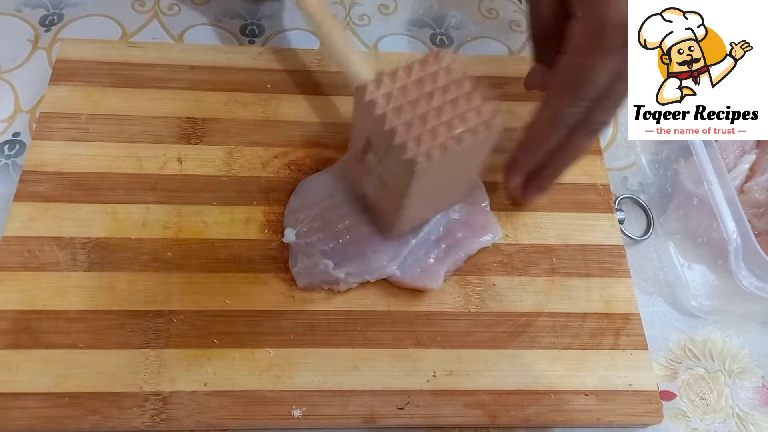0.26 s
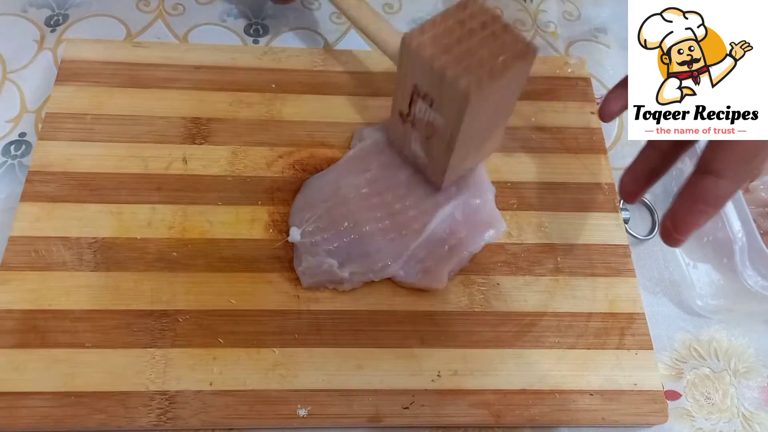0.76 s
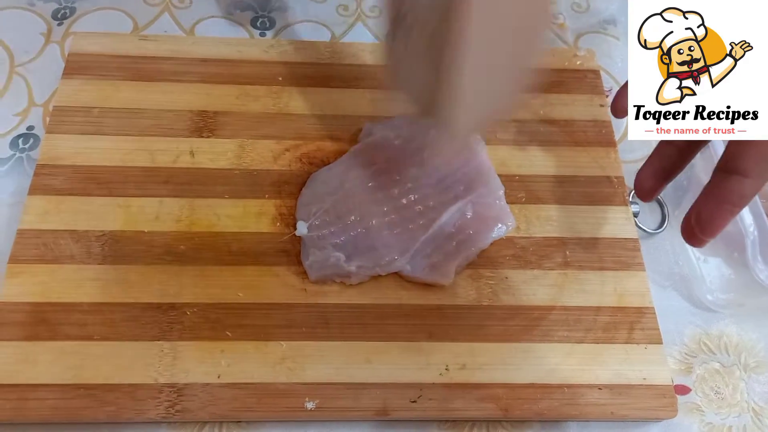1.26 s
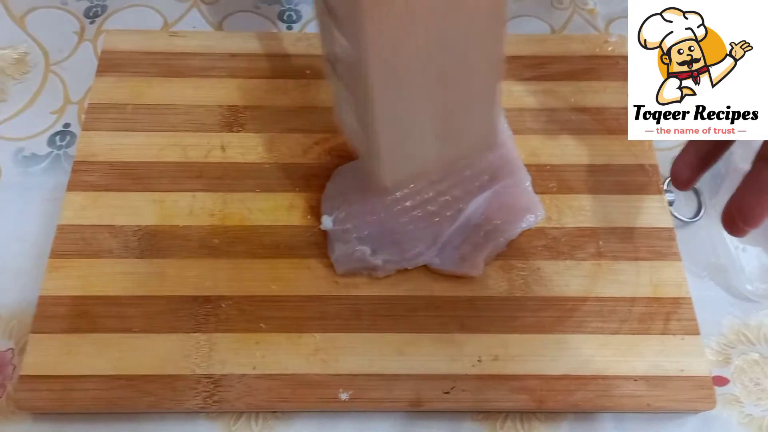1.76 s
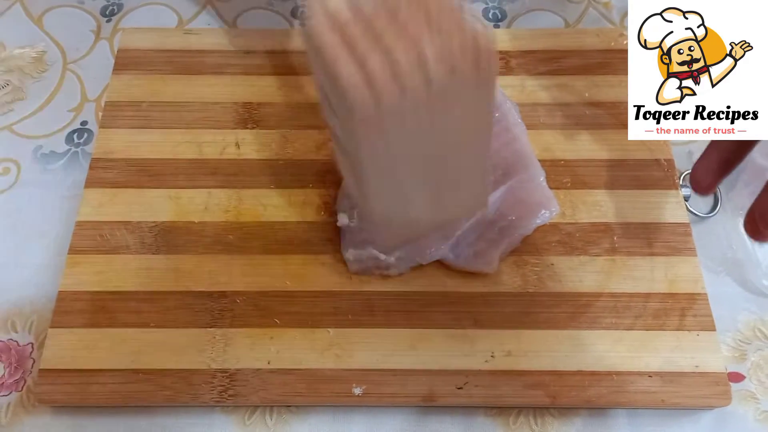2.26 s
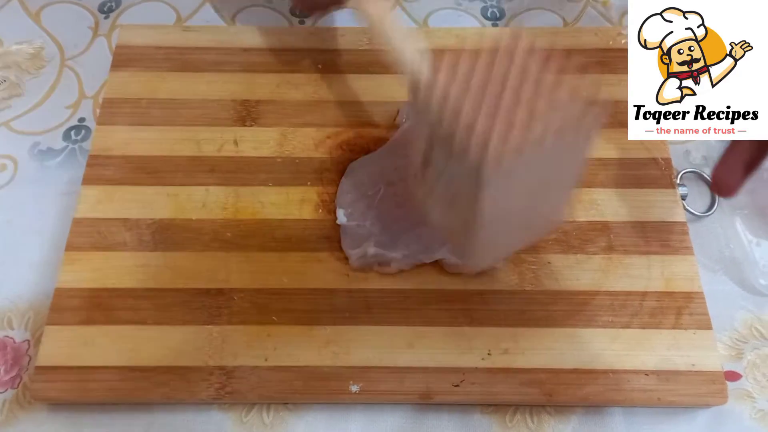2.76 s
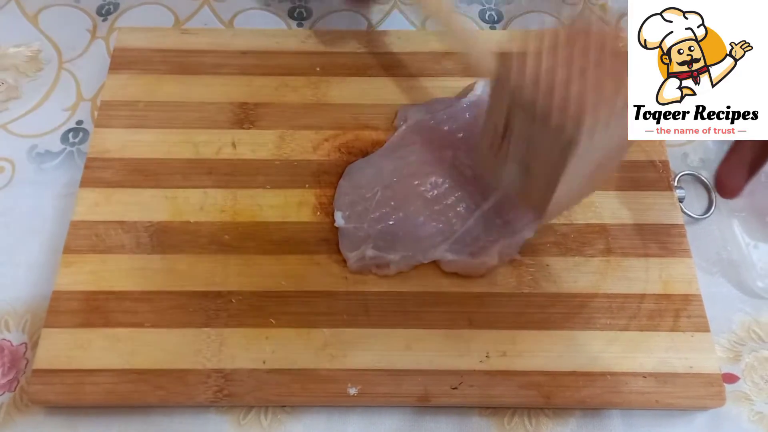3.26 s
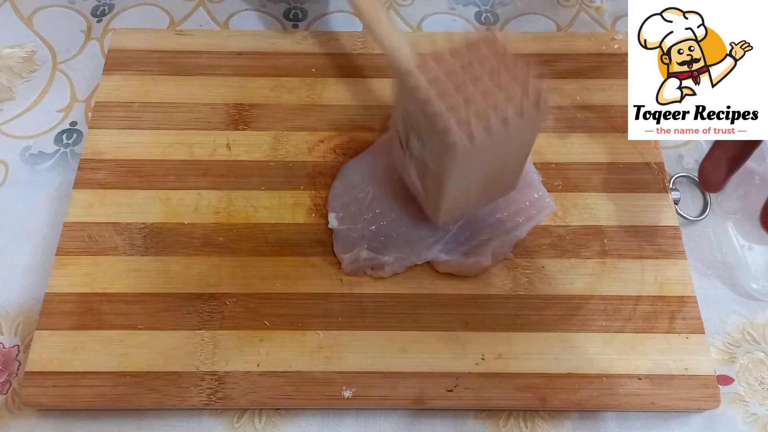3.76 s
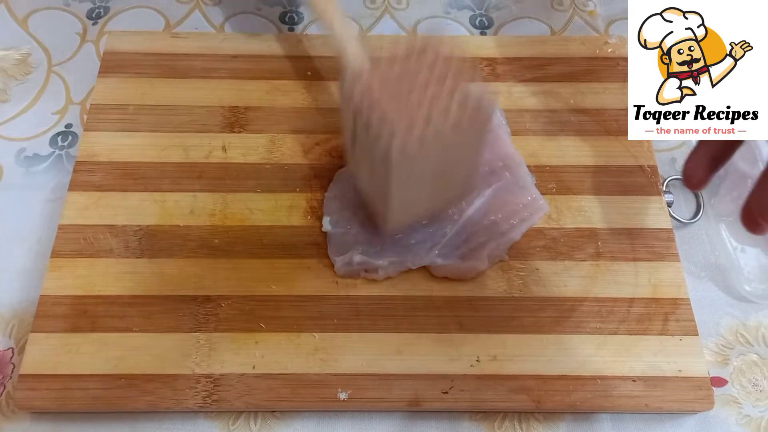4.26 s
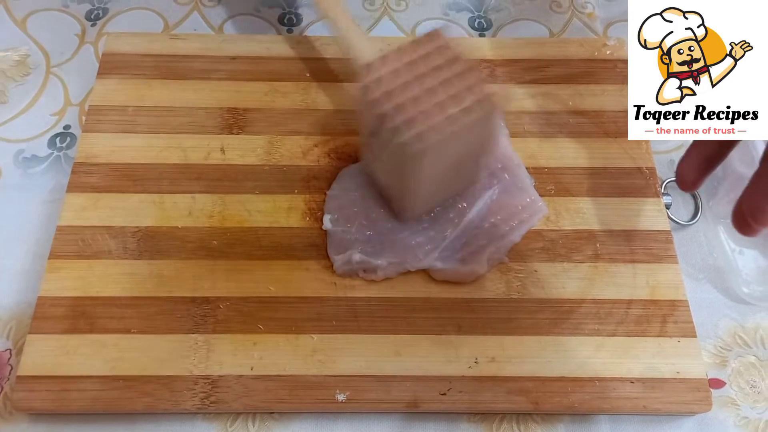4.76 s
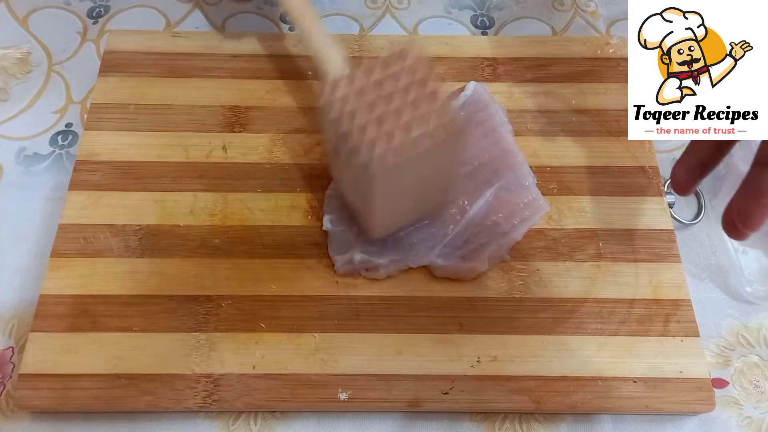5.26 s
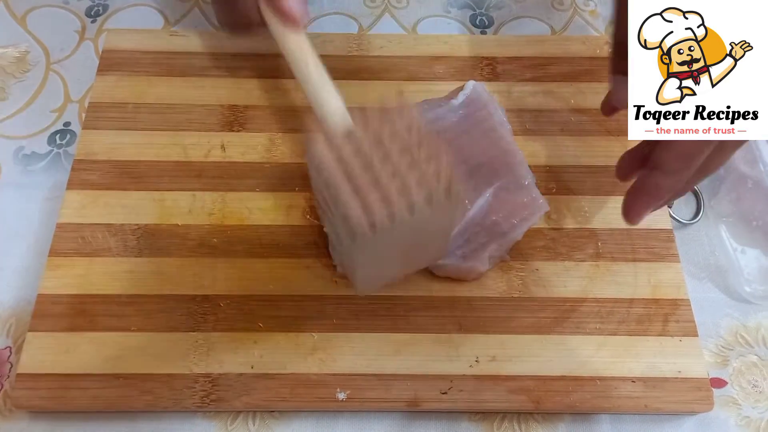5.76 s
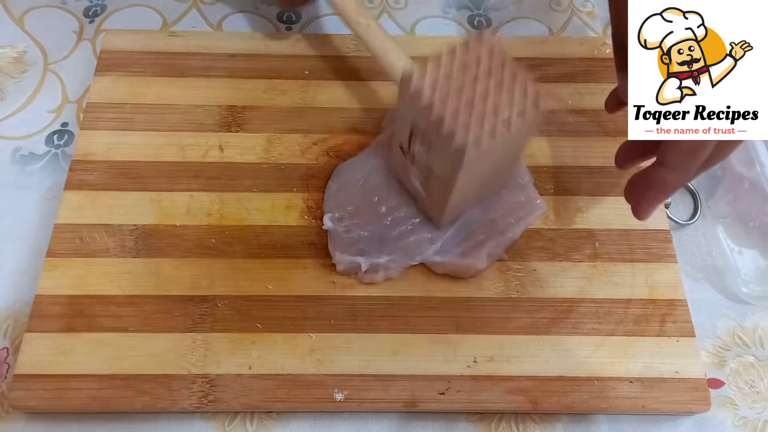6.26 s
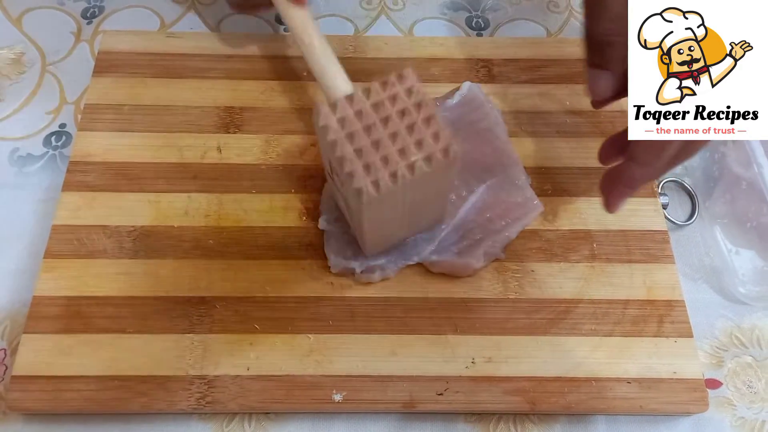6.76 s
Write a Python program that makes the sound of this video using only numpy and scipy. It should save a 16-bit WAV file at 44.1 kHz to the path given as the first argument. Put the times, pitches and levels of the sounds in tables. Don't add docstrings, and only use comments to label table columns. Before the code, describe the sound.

A wooden mallet beats a slice of raw meat on a wooden board at nearly four blows per second without pausing. Each hit is a loud, low, cushioned thud of board and table, with a short dry knock and a quick wet slap. Strength varies from blow to blow. A phone close by picks up short reflections from a small kitchen over a very faint low rumble.

```python
import sys
import numpy as np
from scipy import signal
from scipy.fft import rfft, irfft, next_fast_len
from scipy.io import wavfile
from scipy.ndimage import uniform_filter1d

SR = 44100
rng = np.random.default_rng(int(sys.argv[2]) if len(sys.argv) > 2 else 0)


def volts_from_decibels(level):
    exponent = np.asarray(level, float) / 20
    return 10 ** exponent


def wav_record(signal):
    frames = np.transpose(np.atleast_2d(signal))
    bounded = np.clip(frames, -1, 1)
    quanta = np.round(bounded * 32767).astype(np.int16)
    wavfile.write(sys.argv[1], SR, quanta)


N = 308259

# t/s, thud level/dB, knock level/dB,
# tilt of the knock from board edge to mallet head/dB
BLOWS = [(-0.0202, -13.5, -39.5, 26.5), (0.2556, -16, -19, 2), (0.5433, -12, -22.5, -7),
         (0.822, -11.5, -14.5, -3), (1.1077, -10, -15.5, -1.5), (1.3798, -9.5, -21.5, 6),
         (1.6556, -13, -26.5, 11.5), (1.9197, -8.5, -17, 6), (2.1826, -12, -14.5, -5.5),
         (2.4412, -9, -15.5, -9.5), (2.7097, -14, -26, 2), (2.9757, -12.5, -18, 9.5),
         (3.2377, -9.5, -17.5, 16), (3.4857, -11.5, -32.5, 5.5), (3.75, -12.5, -33, 29),
         (3.991, -15.9, -32.5, -13.5), (4.2338, -8, -18, 0.5), (4.495, -7.5, -24.5, -9.5),
         (4.755, -7.5, -18.5, 8.5), (5.0008, -18, -34.5, 6.5), (5.2546, -16.5, -27, -6),
         (5.483, -8, -16, 5), (5.754, -9.5, -19.5, -15), (6.0196, -11, -23.5, 17),
         (6.2812, -13.5, -19, 3.5), (6.519, -9.5, -18.5, -8), (6.7571, -6, -15.5, 0)]
# smack level/dB, slap level/dB, spray level/dB, left-right/dB
SLAPS = [(-30, -26, -31.5, -2), (-29.5, -29.5, -25.5, 5.5), (-23, -23.5, -25.5, -5), (-25.5, -25, -34, 0.5),
         (-30.5, -29.5, -37.5, -4), (-32, -21, -25, -1), (-36.5, -31, -36.5, -1), (-28, -22.5, -30.5, -1.5),
         (-18.5, -28.5, -39.5, 7.5), (-27, -29, -36.5, 7), (-36, -30, -30.5, 0), (-23, -26.5, -38, -7.5),
         (-17, -25, -34, 0.5), (-47.5, -27, -30.5, -14.5), (-46, -27, -31, -9.5), (-66, -25, -27.5, -4),
         (-29.5, -26, -31, 2), (-30.5, -24, -30, 2), (-35.5, -20.5, -21.5, 1), (-34, -23.5, -27.5, -6.5),
         (-42.5, -33, -37, -6.5), (-21, -22, -29.5, -8), (-31.5, -35, -39, -4.5),
         (-28.5, -24.5, -25.5, 7.5), (-30.5, -23, -27.5, 4.5), (-31, -18.5, -25, -8),
         (-29.5, -20.5, -24.5, -1.5)]
# f/Hz, amplitude/1, t60/s
THUD_MODES = [(54, 0.022, 0.269), (74, 0.303, 0.084), (90, -0.599, 0.055), (117, -0.156, 0.209),
              (139, 0.32, 0.211), (140, -0.153, 0.299), (176, 0.167, 0.142),
              (190, 0.084, 0.198), (213, 0.139, 0.162), (228, 0.163, 0.208), (245, 0.205, 0.192),
               (274, 0.203, 0.161), (291, 0.052, 0.263), (315, 0.062, 0.184), (333, -0.514, 0.051),
               (361, -0.017, 0.17), (404, 0.085, 0.037), (481, -0.008, 0.072)]
# f/Hz, level/dB, t60/s
WOOD_FAMILIES = [
    [(470, 0, 0.028), (548, -3.5, 0.065)],
    [(733, -16, 0.018), (788, 0.5, 0.015)],
    [(954, 10, 0.011), (1095, -4.5, 0.02)],
    [(1220.5, 9.5, 0.0088), (1394, -5, 0.0092)],
    [(1524, -6, 0.0054), (2045, -7, 0.032)],
]
# level over the knock/dB, share of the tilt/1
FAMILY_DRIVE = [(-2.5, -.6), (0, 0.038), (3, .4), (-6, -.2)]
# f/Hz, level/dB
SMACK_COLOUR = [(1500, -7), (2300, -4.5), (2700, -6.5), (3900, -9.5), (4800, -29)]
SLAP_COLOUR = [(3000, -17), (4300, -6), (5200, -4.5), (6400, 3), (7000, -4), (7500, -30)]
SPRAY_COLOUR = [(6900, -43), (7350, -13), (8300, -6), (10000, 2), (12500, -1), (15300, -9.5),
                (15900, -14.5), (16800, -33)]
# f/Hz, level/dB
WALL_COLOUR = [(200, -18), (500, 6), (1200, -1.5), (3000, 5.5), (6500, 2), (10000, -1), (15450, 5),
               (15600, -45.5)]
# f/Hz, t60/s
KITCHEN_DECAY = [(300, 0.3), (800, 0.17), (2000, 0.23), (5000, 0.2), (13000, 0.23)]
# f/Hz, likeness/1
ECHO_LIKENESS = [(300, 1), (640, 0.85), (900, 0.48), (1400, 0.067), (15000, 0.031)]
# t/s, length/s, hiss level/dB, f/Hz
PEELS = [(1.838, 0.1, -67, 880), (1.836, 0.057, -69, 6360), (2.869, .046, -74, 5840),
         (3.64, 0.078, -80, 6500), (3.836, 0.062, -58, 866), (3.83, .05, -71, 1410),
         (3.863, .04, -76, 4000), (3.81, .1, -69, 5100), (5.054, 0.13, -60.5, 3300),
         (5.078, 0.084, -60.5, 4000), (5.098, 0.067, -68, 1860), (5.827, 0.081, -60, 1100),
         (5.833, 0.12, -71, 5500), (6.886, 0.24, -74, 6030)]
# f/Hz, level/dB
RUMBLE_COLOUR = [(22, -17), (45, -6), (65, 10), (85, 8), (130, -3), (200, -15.5), (300, -44.5), (900, -100)]
AIR_COLOUR = [(100, -22.5), (200, -2), (300, -10), (550, -15.5), (1500, -18), (2200, -24), (15400, -28),
              (15600, -89)]
# t/s, level over the rumble/dB
SWELLS = [
    (0, -1),
    (1.17, 7),
    (3.911, 7.5),
    (4.9, 9.5),
    (5.53, 11),
    (6.92, 7.5),
]

LEAD, SPAN = SR // 10, SR * 2 // 5
EARLY_S = 0.004
T = np.arange(SPAN) / SR - EARLY_S
AFTER = np.maximum(T, 0)
USUAL_THUD_DB = -12
SWAY_PER_DB = -0.65
LOW_FAMILY_DB, LOW_PER_DB = -33, 0.94
TOUCH_LEAD_S = 0.0006
KNOCK_SEND_DB, SLAP_SEND_DB = -2.5, 1.28
RUMBLE_DB, AIR_DB, SWELL_S = -65.5, -83.5, 0.21


def thud(db, sway_db):
    hz, size, t60 = np.transpose(THUD_MODES)[:, :, None]
    sway = sway_db * np.clip((190 - hz) / 60, 0, 1)
    shared = rng.normal(0, 0.13, hz.shape)
    own = rng.normal(0, 1.0, (2,) + hz.shape)
    envelope = size * volts_from_decibels(db + sway + shared + own - 60 * AFTER / t60)
    ring = np.sum(envelope * np.sin(2 * np.pi * hz * AFTER), axis=1)
    return coloured(ring, lambda f: 1 / (1 + (f / 600) ** 6))


def knock(families_db):
    hz, level, t60 = np.reshape(WOOD_FAMILIES, (-1, 3)).T[:, :, None]
    top_db = min(families_db[-1], max(families_db[-3:-1]))
    drive = np.repeat([*families_db[:-1], top_db], 2)[:, None]
    shared = rng.normal(0, 2, hz.shape)
    own = rng.normal(0, 1, (2,) + hz.shape)
    struck = drive + level + shared + own
    sooner = np.array([-0.000075, 0.000075])[:, None, None] * np.clip((hz - 600) / 600, 0, 1)
    t = np.maximum(T + 0.00054 + sooner, 0)
    rise = 1 - np.exp(-t / 0.0018)
    hz = hz * rng.normal(1, 0.015, hz.shape)
    envelope = volts_from_decibels(struck + 5.5 - 60 * t / t60) * rise
    return -np.sum(envelope * np.sin(2 * np.pi * hz * t), axis=1)


def slap(smack_db, slap_db, spray_db, pan_db, send_db):
    main = np.exp(np.minimum(T, 0) / 0.00027) * volts_from_decibels(-60 * AFTER / 0.013)
    onset = volts_from_decibels(-36.5 + 5400 * T) * (T < 0)
    dribble = volts_from_decibels(-19.5 - 60 * AFTER / 0.063) * (T > 0)
    swell = main + onset + dribble
    drops = volts_from_decibels(1.7 * unit(uniform_filter1d(rng.standard_normal(SPAN), size=12)))
    layers = [(smack_db, SMACK_COLOUR), (slap_db, SLAP_COLOUR), (spray_db, SPRAY_COLOUR)]
    hiss = sum(volts_from_decibels(db) * noise(colour, size=SPAN) for db, colour in layers)
    burst = blend(hiss, [(1000, 0.29), (15000, 0.067)])
    pan = volts_from_decibels([[pan_db / 2], [-pan_db / 2]])
    direct = volts_from_decibels(2.5) * burst * swell * unit(drops) * pan
    impulse = 1.0 * (np.abs(T) < 0.5 / SR)
    click = sum(volts_from_decibels(db) * unit(coloured(impulse, lambda f: volts_from_decibels(along(colour, f)))) for db, colour in layers)
    sent = volts_from_decibels(send_db - 25.0) * click * np.exp(np.minimum(T, 0) / 0.00021)
    return direct + walls(sent)


def peel(length, db, hz):
    shape = np.clip(T / 0.0042, 0, 1) * volts_from_decibels(-400 * np.maximum(T - 0.5 * length, 0))
    wide = 0.04 if hz < 4500 else 0.1
    hump = [(hz * 0.4, -30), (hz * (1 - wide), -13), (hz, 0), (hz * (1 + wide), -13),
            (max(hz * 1.11, 7200), -24), (7700, -80)]
    return shape * volts_from_decibels(db) * noise(hump, size=SPAN)


def walls(sound, near_db=-9, wall_s=0.0148, wall_db=4, wall_t60=0.0035):
    hz, t, z = signal.stft(rng.standard_normal((2, SPAN)), SR, nperseg=256)
    decay_db = 60 * t / along(KITCHEN_DECAY, hz)[:, None]
    z = z * volts_from_decibels(along(WALL_COLOUR, hz)[:, None] - decay_db)
    tail = blend(signal.istft(z, SR, nperseg=256)[1][:, :SPAN], ECHO_LIKENESS)
    late = T + EARLY_S - wall_s
    tail *= np.where(late < 0, volts_from_decibels(near_db), 1 + volts_from_decibels(wall_db - 60 * late / wall_t60))
    tail *= volts_from_decibels(-150 * (T + EARLY_S) ** 2)
    return signal.fftconvolve(sound[None], volts_from_decibels(-32) * tail, axes=1)[:, :SPAN]


def house():
    t = np.arange(N) / SR
    level_db = RUMBLE_DB + sum(db * np.exp(-((t - s) / SWELL_S) ** 2) for s, db in SWELLS)
    rumble = volts_from_decibels(level_db) * blend(noise(RUMBLE_COLOUR, size=N), [(100, 0.82)])
    air = volts_from_decibels(AIR_DB) * blend(noise(AIR_COLOUR, size=N), [(200, 0.9), (640, 0.21), (1400, 0.1)])
    return rumble + air


def unit(x):
    return x / np.sqrt(np.mean(x ** 2) + 1e-20)


def along(points, hz):
    f, v = np.transpose(points)
    return np.interp(np.log(hz + 1), np.log(f + 1), v)


def coloured(x, response):
    m = next_fast_len(x.shape[-1] + 4096)
    spectrum = rfft(x, m) * response(np.fft.rfftfreq(m, 1 / SR))
    return irfft(spectrum, m)[..., :x.shape[-1]]


def noise(colour, size):
    return unit(coloured(rng.standard_normal((2, size)), lambda hz: volts_from_decibels(along(colour, hz))))


def blend(pair, alike):
    def mid_side(hz):
        turn = np.arccos(np.clip(along(alike, hz), -1, 1)) / 2
        return np.array([np.cos(turn), np.sin(turn)])
    mid, side = coloured(pair, mid_side)
    return np.array([mid + side, mid - side])


def add(track, s, sound):
    track[:, LEAD + round((s - EARLY_S) * SR):][:, :SPAN] += sound


def scene():
    track = np.zeros((2, LEAD + N + SPAN))
    for (force_s, thud_db, knock_db, tilt_db), wet in zip(BLOWS, SLAPS):
        harder_db = thud_db - USUAL_THUD_DB
        low = thud(thud_db, SWAY_PER_DB * harder_db)
        upper_db = [knock_db + db + share * tilt_db for db, share in FAMILY_DRIVE]
        wood = knock([LOW_FAMILY_DB + LOW_PER_DB * harder_db] + upper_db)
        blunt = volts_from_decibels(4) * wood.mean(0) * volts_from_decibels(-60 * AFTER / 0.02)
        echo = walls(volts_from_decibels(-4) * low.mean(0) + volts_from_decibels(KNOCK_SEND_DB + 1.5) * blunt)
        add(track, force_s, low + wood + echo)
        add(track, force_s - TOUCH_LEAD_S, slap(*wet, SLAP_SEND_DB))
    for s, *how in PEELS:
        add(track, s, peel(*how))
    return track[:, LEAD:LEAD + N] + house()


def roll_off(x):
    return signal.sosfilt(signal.butter(12, 16760, fs=SR, output="sos"), x)


def record(dry):
    thinned = signal.sosfilt(signal.butter(2, 45, "high", fs=SR, output="sos"), dry)
    rounded = thinned / (1 + np.abs(thinned / 0.95) ** 4) ** (1 / 4)
    finished = coloured(rounded, lambda hz: np.clip((16900 - hz) / 700, 0, 1) ** 2)
    return roll_off(finished)


dry = scene()
out = record(dry)
wav_record(out)
```